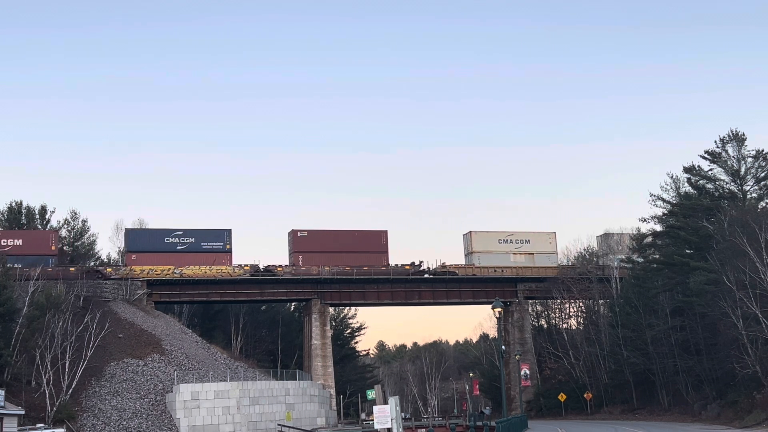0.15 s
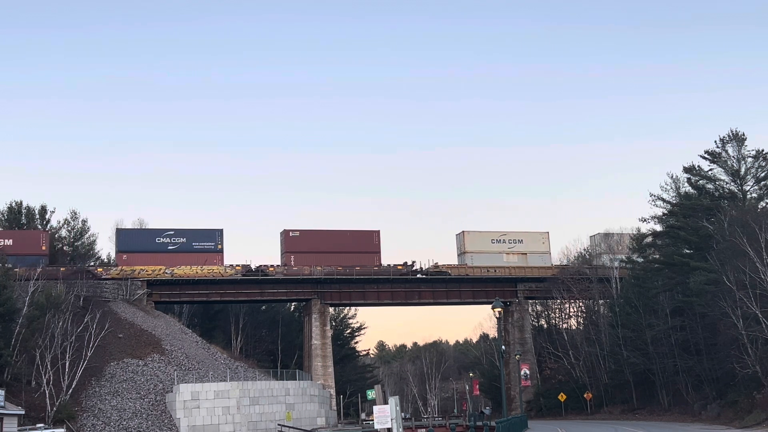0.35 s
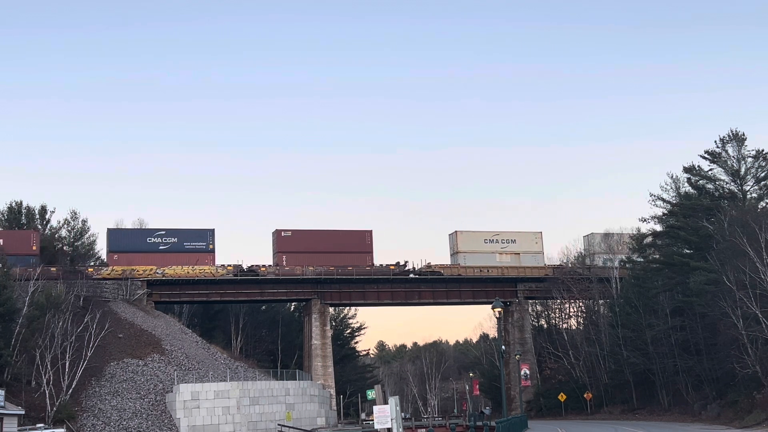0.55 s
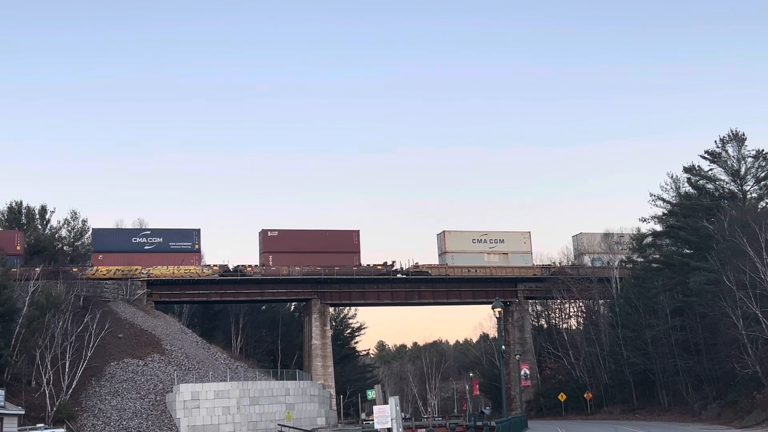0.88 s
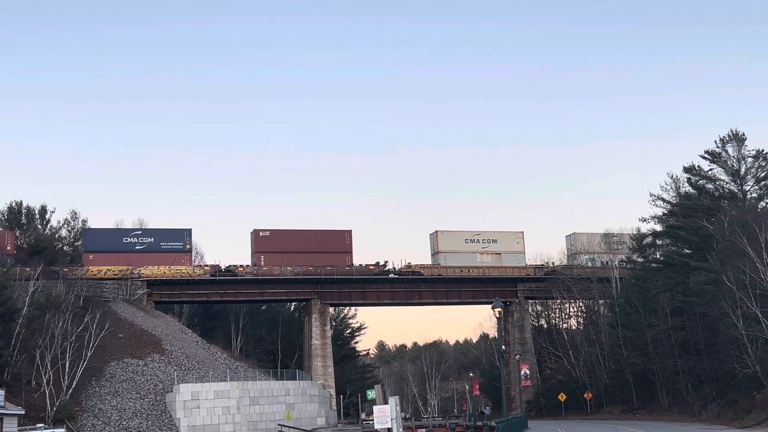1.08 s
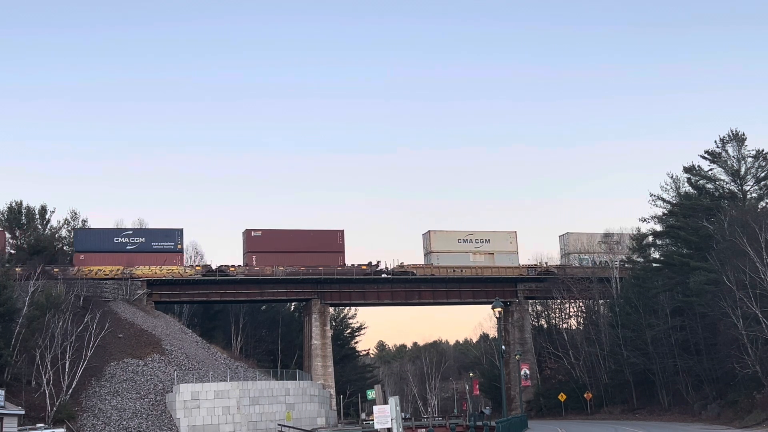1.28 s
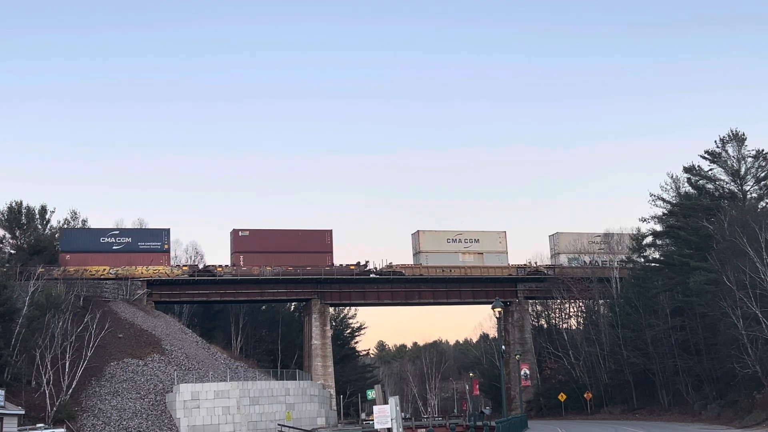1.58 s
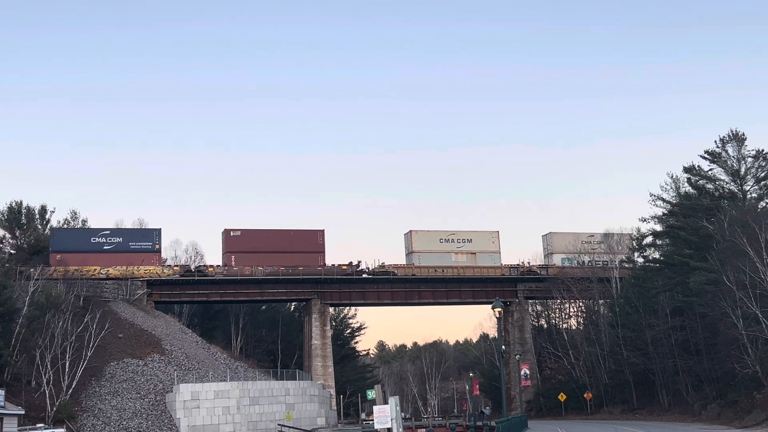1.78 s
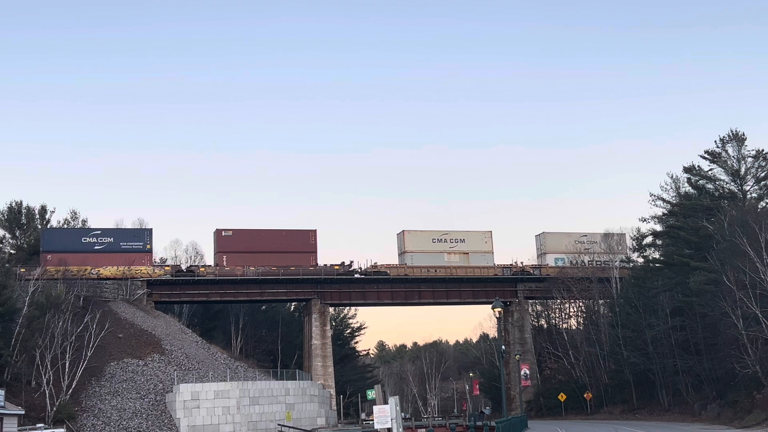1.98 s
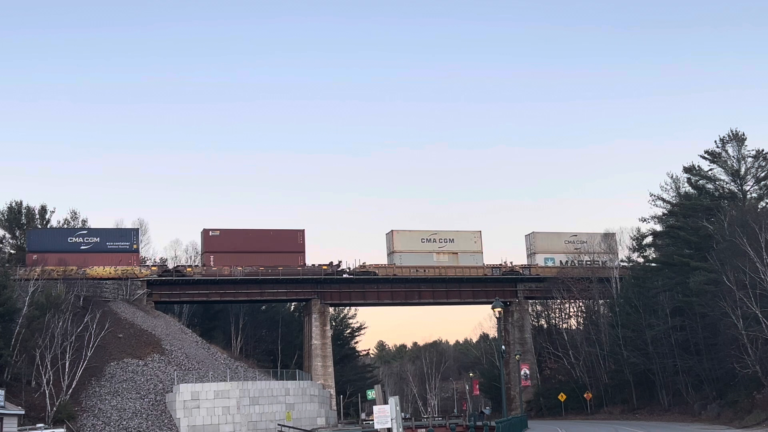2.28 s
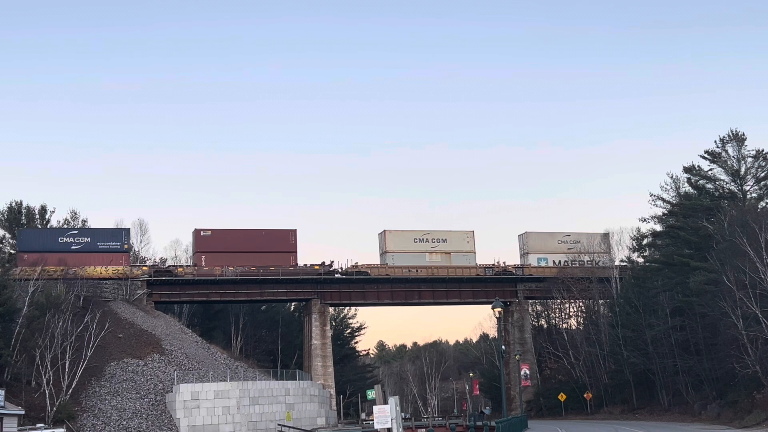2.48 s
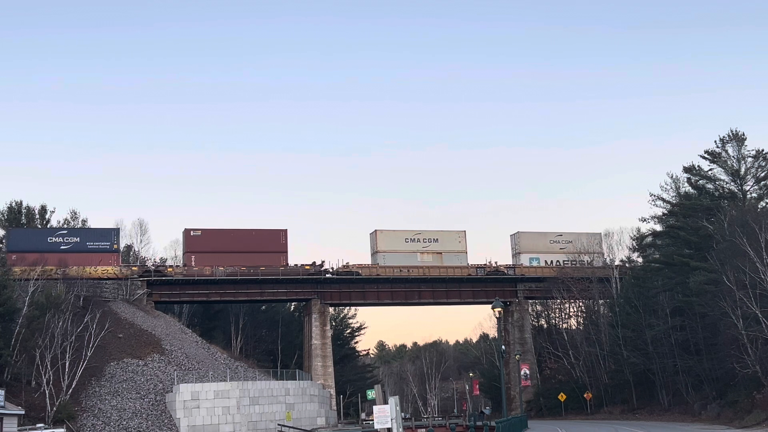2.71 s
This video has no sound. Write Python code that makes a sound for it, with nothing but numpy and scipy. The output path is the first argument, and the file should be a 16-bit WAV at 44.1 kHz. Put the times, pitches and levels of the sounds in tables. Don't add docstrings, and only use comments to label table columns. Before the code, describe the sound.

Deep, uneven rumble of a distant freight train crossing a steel girder bridge outdoors.

```python
import sys
import numpy as np
from scipy import signal
from scipy.fft import rfft, irfft, next_fast_len
from scipy.io import wavfile
from scipy.ndimage import uniform_filter1d

SR = 44100
rng = np.random.default_rng(int(sys.argv[2]) if len(sys.argv) > 2 else 0)


def undo_db(level):
    steps = np.asarray(level, float) / 20
    return 10 ** steps


def log_audio(samples):
    frames = np.atleast_2d(samples).T
    limited = np.clip(frames, -1, 1)
    pcm = np.round(limited * 32767).astype(np.int16)
    wavfile.write(sys.argv[1], SR, pcm)


N = 125685

# pitch in Hz, width in Hz, level in dB.
GIRDER_NOTES = [(51, 4.4, -39.5), (58.35, 8.4, -38.5), (72.9, 7.1, -38.5), (104.3, 8.1, -41),
                (129.8, 29, -48), (265, 40, -60.5)]
# start in seconds, peak level in dB, girder pitch in Hz.
AXLES = [(0.0, -27, 63.4), (0.083, -18.5, 73.4), (.125, -20.5, 56.4), (.165, -23, 62.3),
         (0.254, -15.5, 73.6), (0.377, -21.5, 74), (0.432, -23, 52), (0.522, -27.5, 70), (0.608, -21, 105),
         (0.688, -19.5, 65), (0.735, -16, 54.55), (0.871, -24, 69.7), (0.971, -28, 64.5),
         (1.022, -25, 50.2), (1.08, -28, 86.2), (1.149, -22.5, 88.2), (1.164, -19, 58.3), (1.28, -20, 63),
         (1.337, -20, 49.2), (1.402, -21, 72.3), (1.503, -26, 57), (1.652, -25, 83.7), (1.71, -24, 66.5),
         (1.893, -19, 57.3), (1.942, -25, 87.2), (2.016, -17.5, 53.9), (2.058, -18.5, 73),
         (2.112, -22, 74.6), (2.158, -14, 64.4), (2.251, -21, 73.5), (2.328, -17.5, 67.8),
         (2.419, -20, 55.5), (2.483, -21, 72.8), (2.572, -27.5, 80.8), (2.642, -20.5, 70),
         (2.699, -20, 56.2), (2.763, -24.5, 69), (2.829, -28, 54.5)]


def girders():
    rise_s, fall_s, swell_db = 0.02447, 0.025, -1.5
    t = np.arange(N) / SR
    out = np.zeros(N)
    for hz, width_hz, db in GIRDER_NOTES:
        noise = rng.standard_normal(N + SR)
        hum = resonance(resonance(noise, hz, width_hz), hz, 2 * width_hz)
        out += undo_db(db) * rms_one(hum[SR:])
    for start, db, hz in AXLES:
        u = t - start - rise_s
        swell = np.exp(-(u / np.where(u < 0, rise_s / 2, fall_s)) ** 2)
        phase = rng.uniform(0, 2 * np.pi)
        out += undo_db(db + swell_db) * swell * np.sin(2 * np.pi * hz * u + phase)
    return out


# time in seconds, level in dB.
ROLL = [(0.0, -47), (0.33, -48.5), (0.74, -48), (1.02, -50.5), (1.04, -50.5), (1.05, -48.5), (1.59, -51),
        (1.65, -48), (1.94, -48.5), (2.03, -47), (2.79, -47), (2.85, -43.5)]
# frequency in Hz, level in dB per Hz.
DECK = [(25, -19.5), (40, -11.5), (60, -18), (85, -7), (125, -1), (180, -13), (280, -13.5), (500, -31.5)]
# frequency in Hz, level in dB per Hz.
RAILS = [(250, 0), (400, -2.5), (600, -5.5), (1000, -8), (1500, -13.5), (2000, -16), (2600, -24.5),
         (3400, -34)]


def deck_and_rails():
    roll_db = in_time(ROLL)
    deck_db = -36.5 + 0.24 * (roll_db - roll_db.mean())
    deck = undo_db(deck_db) * stereo_noise(DECK, patchy_db=-2.5, flicker_rate=9.5)
    roar = undo_db(roll_db + 1.61) * stereo_noise(RAILS, patchy_db=0.55, flicker_rate=8.6)
    return deck + roar


# time in seconds, level in dB.
HISS_LOAD = [(0, -66.5), (.3, -68), (.55, -67), (.8, -71), (1.1, -68.5), (1.4, -66.5), (1.58, -72),
             (1.85, -65.5), (2.1, -72.5), (2.3, -68.5), (2.55, -71), (2.75, -65), (2.85, -61.5)]
# frequency in Hz, level in dB per Hz.
HISS = [(2000, -1.5), (2800, 4), (3300, -3), (4000, -6), (5000, -9), (6000, -15), (8000, -23.5),
        (9400, -33.5), (10000, -61)]


def flange_hiss():
    return undo_db(in_time(HISS_LOAD) + 3) * stereo_noise(HISS, patchy_db=1.5, flicker_rate=9.9)


# pitch in Hz, width in Hz, level in dB.
RINGS = [(496, 60, -64), (950, 110, -57), (700, 90, -55), (1060, 130, -58), (1370, 100, -60),
         (990, 120, -58), (1150, 100, -60), (256.5, 60, -55), (950, 900, -53), (2050, 700, -62)]
# start in seconds, length in seconds.
RING_SPANS = [(0.0, .9), (1.95, .14), (2.13, .08), (2.14, .07), (2.19, .06), (2.2, .12), (2.31, .11),
              (1.7, .6), (1.98, .47), (1.96, .2)]


def wheel_rings():
    t, out = np.arange(N) / SR, np.zeros((2, N))
    for (start, length), (hz, width_hz, db) in zip(RING_SPANS, RINGS):
        noise = rng.standard_normal((2, N))
        mixed = noise + 1.3 * noise[::-1]
        ring = resonance(resonance(mixed, hz, width_hz), hz, width_hz)
        swell = np.sin(np.pi * np.clip((t - start) / length, 0, 1))
        out += undo_db(db) * rms_one(ring) * swell
    return out


# time in seconds, level in dB.
CLANKS = [
    (1.642, -50),
    (1.654, -53),
    (1.665, -57),
    (2.814, -56),
]


def clanks():
    t = np.arange(N) / SR
    shape = np.zeros(N)
    for peak_s, db in CLANKS:
        time_for_60_db = np.where(t < peak_s, 0.03, 0.08)
        shape += undo_db(db - 14 - 60 * np.abs(t - peak_s) / time_for_60_db)
    return shape * rms_one(band(rng.standard_normal(N), 2600, 4600, order=4))


# dull level, bright level, sharp level and airy level, all in dB.
CRACKS = [(-53.5, -71, -78, -72), (-37, -57, -68, -71), (-37, -56.5, -61, -69.5), (-50.5, -64, -59, -63.5),
          (-45, -69, -72, -69), (-41.5, -68, -74, -72), (-56, -78, -75, -67.5), (-54, -72, -80, -68.5),
          (-50.5, -70, -78, -79), (-59.5, -76, -80, -75.5)]
CRACK_TIMES = [1.030, 1.0373, 1.0430, 1.0488, 1.0533, 1.0588, 1.064, 1.073, 1.298, 1.309]
# pitch in Hz, width in Hz.
CRACK_BODY = [
    (1500, 700),
    (4400, 1300),
    (6800, 2600),
    (12800, 3600),
]


def crackle():
    count, spread_s, fade_db = 3, 0.0007, 9
    order = np.arange(count)
    delay_s = spread_s * rng.random((len(CRACKS), count)) * order
    at = ((np.array(CRACK_TIMES)[:, None] + delay_s) * SR).astype(int)
    out = np.zeros((2, N))
    for k, (hz, width_hz) in enumerate(CRACK_BODY):
        clicks = np.zeros(N)
        clicks[at] = undo_db(np.array(CRACKS)[:, [k]] - fade_db * order)
        rung = resonance(clicks, hz, width_hz)
        rung = band(rung, hz - 0.6 * width_hz, hz + 0.6 * width_hz, order=3) * SR / width_hz
        out += rung + 0.2 * np.roll(rung, shift=9) * [[1], [-1]]
    return out


# start in seconds, length in seconds, start pitch in Hz, end pitch in Hz, level in dB.
CHIRPS = [
    (.391, .044, 6600, 7700, -77),
    (.44, .05, 7400, 7450, -86),
    (1.709, .034, 6750, 7280, -80.5),
    (1.755, .055, 7250, 7200, -86),
    (1.877, .016, 6700, 7200, -82),
    (1.942, .034, 6380, 6000, -69.5),
    (2.738, .031, 6700, 7300, -79.5),
]
CHIRP_BEND = [.7, 1.0, .3, 1.0, 1.0, 2.2, .7]
CHIRP_PAN_DB = [1.0, 1.0, .6, .6, .6, 10, 0.1]
# delay in seconds, level in dB.
FAR_ECHOES = [(.11, -18), (.137, -14), (.17, -16)]


def birds():
    echo_s, echo_db, trees_t60_s, trees_db = 0.043, -11, 0.6, -10
    t, out = np.arange(N) / SR, np.zeros((2, N))
    waver_hz = 70 * drift(120)
    flutter = undo_db(3 * drift(90))
    for (start, length, start_hz, end_hz, db), bend, pan_db in zip(CHIRPS, CHIRP_BEND, CHIRP_PAN_DB):
        u = np.clip((t - start) / length, 0, 1)
        pitch_hz = start_hz + (end_hz - start_hz) * u ** bend + waver_hz
        whistle = np.sin(2 * np.pi * np.cumsum(pitch_hz) / SR) * np.sqrt(np.sin(np.pi * u) + 1e-12)
        out += undo_db(db) * np.sqrt(2) * flutter * whistle * undo_db([[pan_db / 2], [-pan_db / 2]])
    mono, lag = out.mean(axis=0), t[:SR // 4]
    trees = rng.standard_normal(len(lag)) * undo_db(-60 * lag / trees_t60_s) * (lag > echo_s / 2)
    tail = signal.fftconvolve(mono, rms_one(trees) / np.sqrt(len(lag)))[:N]
    out += undo_db(trees_db) * tail
    for delay_s, db in [(echo_s, echo_db), *FAR_ECHOES]:
        out += undo_db(db) * np.roll(mono, int(delay_s * SR))
    return out


# frequency in Hz, level in dB per Hz.
AIR = [(9900, -29.5), (10600, -3), (11500, 3.5), (12700, 1), (13600, -2), (14600, -8), (15300, -11)]
# start in seconds, length in seconds, level in dB.
STIRS = [
    (0.986, 0.24, -89),
    (1.254, .11, -89),
    (1.836, .06, -101),
    (2.71, 0.33, -105),
]


def rustle():
    t = np.arange(N) / SR
    level = np.full(N, undo_db(-99.5))
    for start, length, db in STIRS:
        level += undo_db(db) * np.sin(np.pi * np.clip((t - start) / length, 0, 1) ** 0.5)
    return level * stereo_noise(AIR, patchy_db=0.5, flicker_rate=7)


# frequency in Hz, likeness from 0 to 1.
LIKENESS = [(60, 0.99), (200, 0.94), (400, 0.84), (750, .58), (1400, 0.5), (2300, .98), (4200, .98),
            (5800, 0.64), (8500, .5), (12000, .94)]


def stereo_noise(spectrum, patchy_db, flicker_rate):
    low_hz, high_hz = spectrum[0][0], spectrum[-1][0]
    together = drift(18)
    edges = low_hz * 2 ** (np.arange(int(3 * np.log2(high_hz / low_hz)) + 2) / 3)
    noise = coloured(spectrum, next_fast_len(N + 8000))
    out = 0
    for k, (low, high) in enumerate(zip(edges, np.minimum(edges[1:], 19000))):
        mid, side = band(noise[k % 2], low, high, order=3)[:, -N:]
        alike = np.clip(at_hz(LIKENESS, np.sqrt(low * high)), 0, 1)
        gain = undo_db(patchy_db * (0.11 * together + drift(flicker_rate)))
        pair = np.sqrt(1 + alike) * mid + np.sqrt(1 - alike) * side * [[1], [-1]]
        out = out + gain * pair
    return rms_one(out)


def coloured(spectrum, size):
    hz = np.arange(size // 2 + 1) * SR / size + 1
    return irfft(rfft(rng.standard_normal((2, 2, size))) * undo_db(at_hz(spectrum, hz)), size)


def drift(rate):
    r = np.exp(-80 * np.pi * rate / SR)
    slow = signal.lfilter([1], [1, -2 * r, r * r], rng.standard_normal(N // 40 + 2002))[2000:]
    return np.interp(np.arange(N) / 40, np.arange(len(slow)), rms_one(slow))


def resonance(x, hz, width_hz):
    r = np.exp(-np.pi * width_hz / SR)
    ringing = [1, -2 * r * np.cos(2 * np.pi * hz / SR), r * r]
    return signal.lfilter([(1 - r * r) / 2, 0, (r * r - 1) / 2], ringing, x + 1e-18)


def band(x, low_hz, high_hz, order):
    return signal.sosfilt(signal.butter(order, [low_hz, high_hz], "band", fs=SR, output="sos"), x)


def rms_one(x):
    return x / np.sqrt(np.mean(x ** 2) + 1e-20)


def in_time(rows):
    s, db = np.transpose(rows)
    return np.interp(np.arange(N) / SR, s, db)


def at_hz(points, hz):
    p = np.array(points, float)
    return np.interp(np.log(hz), np.log(np.maximum(p[:, 0], 20)), p[:, 1])


# frequency in Hz, lead in radians.
LEAD = [(100, 0.066), (950, -0.32), (1290, 0.085), (1550, -1.6), (1900, -0.017), (2840, 0.75), (4000, 0)]
# frequency in Hz, left minus right level in dB.
LEAN = [(60, 0.15), (400, 0.4), (750, .2), (1200, -1.8), (2650, 0), (6000, .5), (12000, 2)]


def two_ports(x):
    size = next_fast_len(N + 4000)
    hz = np.arange(size // 2 + 1) * SR / size + 1
    left = undo_db(at_hz(LEAN, hz) / 2) * np.exp(0.5j * at_hz(LEAD, hz))
    return irfft(rfft(x, size) * [left, 1 / left], size)[:, :N]


def scene():
    train = girders() + deck_and_rails() + flange_hiss() + wheel_rings() + clanks()
    return two_ports(train + crackle() + rustle()) + birds()


def top_cut(x):
    return signal.sosfilt(signal.butter(12, 15200, fs=SR, output="sos"), x)


def record(dry):
    bass = uniform_filter1d(np.abs(dry.mean(axis=0)), size=1500)
    buzz = undo_db(-67.5) * bass * rms_one(band(rng.standard_normal(N), 9480, 9760, order=4))
    rumble_cut = signal.butter(3, 22.2, "high", fs=SR, output="sos")
    return top_cut(signal.sosfilt(rumble_cut, dry) + buzz)


dry = scene()
out = record(dry)
log_audio(out)
```